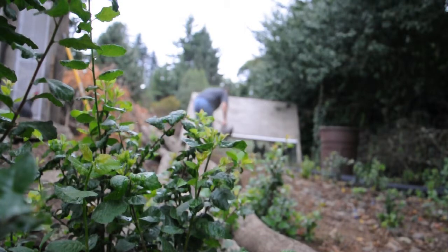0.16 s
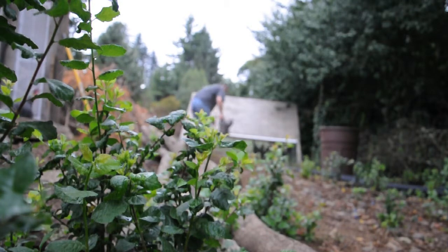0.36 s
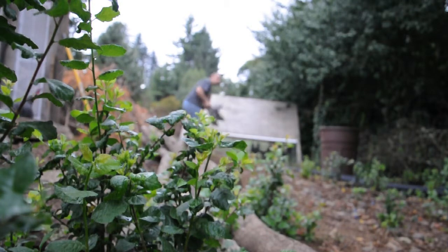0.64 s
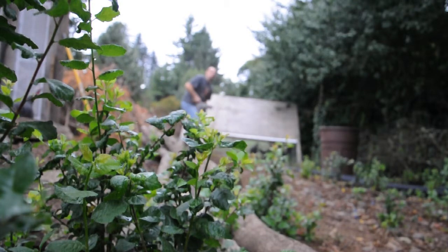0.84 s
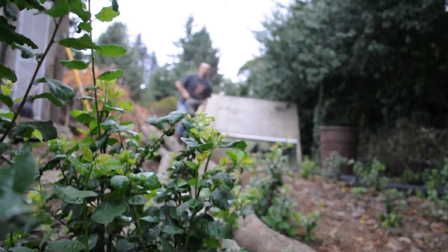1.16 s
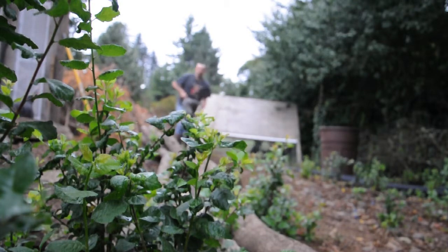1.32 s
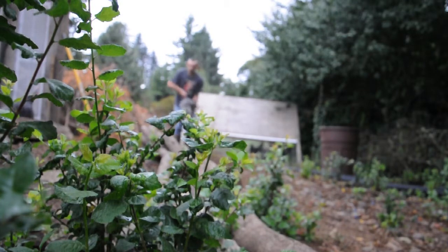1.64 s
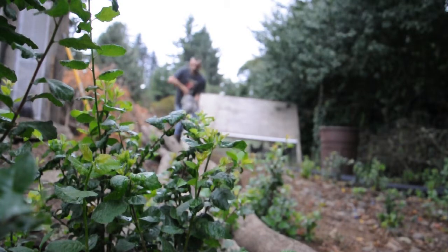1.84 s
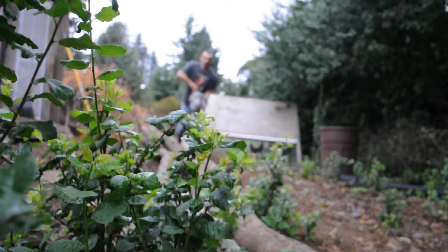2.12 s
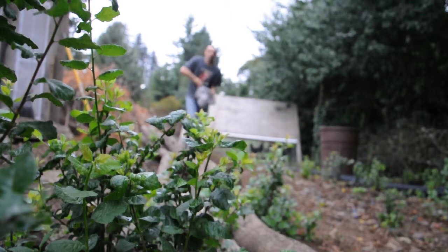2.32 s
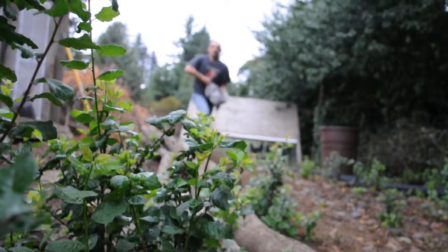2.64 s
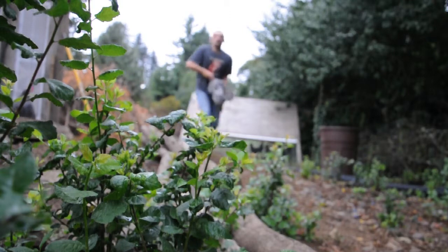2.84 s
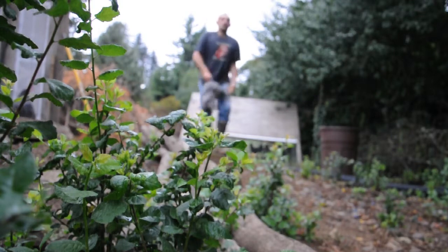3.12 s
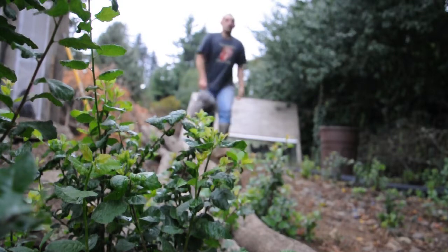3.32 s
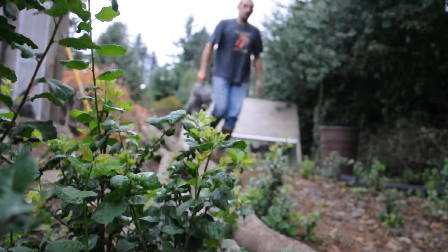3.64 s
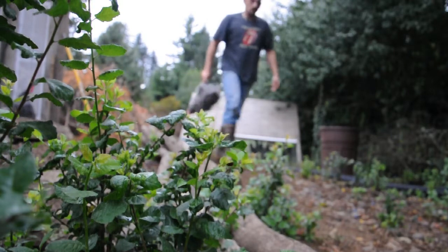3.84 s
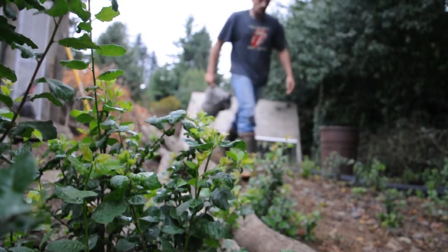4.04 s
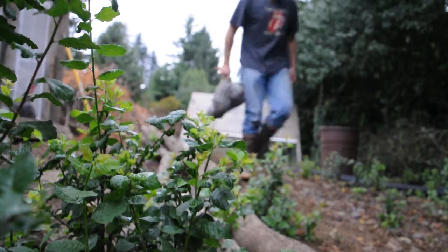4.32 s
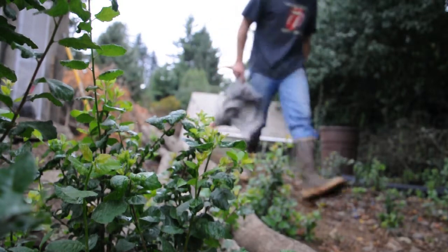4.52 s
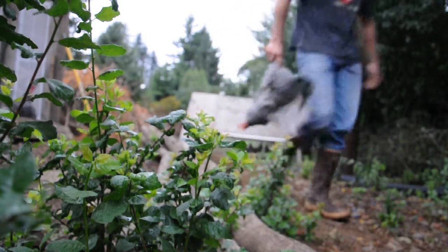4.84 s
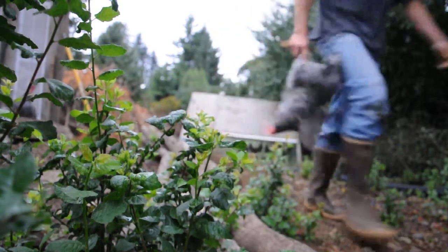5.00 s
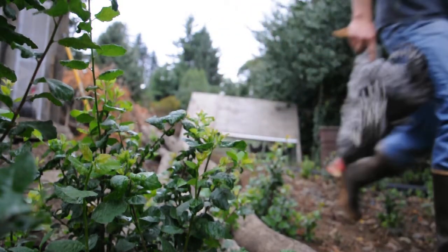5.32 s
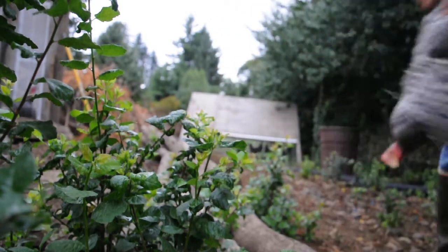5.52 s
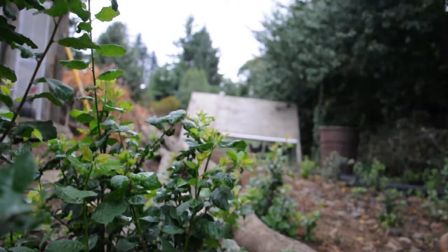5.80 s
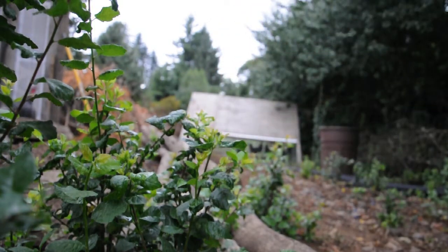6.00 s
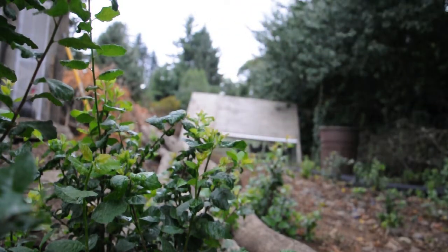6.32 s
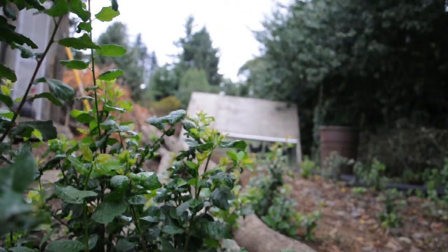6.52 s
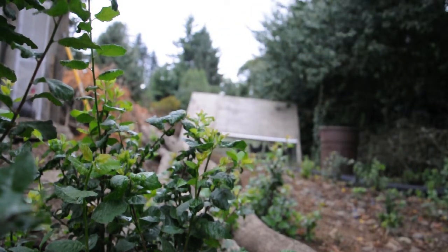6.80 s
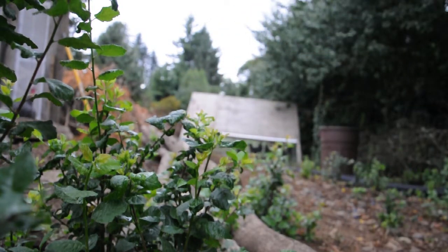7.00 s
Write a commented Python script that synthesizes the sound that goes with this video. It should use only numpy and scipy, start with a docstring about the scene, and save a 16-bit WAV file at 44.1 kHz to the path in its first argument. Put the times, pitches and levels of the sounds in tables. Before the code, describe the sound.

A heavy bump on a chicken coop leaves a short hollow boom. A hen gives high, strained squawks mixed with low creaky clucks, building to a burst of loud shrieks. She settles into softer clucking, with two more raspy squawks, as boots scuff through mulch and thud past the microphone. The garden is quiet, with a faint echo.

```python
"""A quiet garden, one microphone. A heavy bump at the coop opens the scene and leaves a hollow boom.
A hen is caught, and her syrinx answers in two voices, at times both at once: a high strained tone
(squawks that whine or shriek) and low creaky pulses (clucks). The yard echoes her faintly.
Then she is carried past the microphone, still clucking, as boots scuff and thud through the mulch."""
import sys
import numpy as np
from scipy import signal
from scipy.fft import rfft, irfft, next_fast_len
from scipy.io import wavfile
from scipy.ndimage import map_coordinates

SR = 44100
rng = np.random.default_rng(int(sys.argv[2]) if len(sys.argv) > 2 else 0)


def unload_audio(sound):
    """Save the sound as a 16-bit wav file, at the path given as the first command line argument."""
    columns = np.transpose(np.atleast_2d(sound))
    # keep every value between -1 and 1, then stretch to whole-number steps
    steps = np.round(np.clip(columns, -1, 1) * 32767)
    wavfile.write(sys.argv[1], SR, steps.astype(np.int16))


N = 315756
TIME = np.arange(N) / SR
TOP_HZ = 5050  # the treble stops here

# Resonances of the beak. Each row: centre in Hz, half-width in Hz, gain in dB.
BEAK_MODES = [(1208, 207, 1.5), (1788, 272, -7.5)]
# Higher resonances, the edge on her voice. Each row: centre in Hz, half-width in Hz, gain in dB.
EDGE_MODES = [(2847, 278, 2), (3780, 320, -2)]


def amp(db):
    return 10 ** (np.asarray(db) / 20)


def unit(x):
    return x / np.sqrt(np.mean(x ** 2) + 1e-20)


def along(points, hz):
    """Read (Hz, value) points at hz, on a log axis."""
    f, v = np.transpose(points)
    return np.interp(np.log(hz + 1), np.log(f + 1), v)


def curves(rows, t):
    """Each column after the first, at the times t."""
    s, *cols = np.transpose(rows)
    return [np.interp(t, s, c) for c in cols]


def wobble(rate, size):
    """A smooth random curve, rate knots a second."""
    knots = rng.standard_normal(int(size * rate / SR) + 4)
    return map_coordinates(knots, [np.arange(size) * rate / SR])


def filtered(x, response):
    """x through a complex frequency response."""
    size = next_fast_len(len(x) + 8192)
    return irfft(rfft(x, size) * response(np.fft.rfftfreq(size, 1 / SR)), size)[:len(x)]


def resonate(x, modes):
    """x through a bank of steep-sided resonances of alternating sign."""
    def band(f, hz, half_width):
        damping = 2j * f * half_width
        return (damping / (hz * hz - f * f + damping)) ** 2
    return filtered(x, lambda f: sum((-1) ** k * amp(db) * band(f, hz, half_width)
                                     for k, (hz, half_width, db) in enumerate(modes)))


def add(track, start, sound):
    """Mix a sound in at start seconds."""
    part = track[max(round(start * SR), 0):][:len(sound)]
    part += sound[:len(part)]


def garden(tread_swell_db=3, leaf_swell_db=7.5, crunch_db=4.5, split_hz=1500):
    """Quiet outdoor air, and the uneven rustle of boots and brushed leaves nearing the microphone."""
    # Each row: time in seconds, air level in dB, rustle level in dB.
    levels = [(0, -35, -43), (.7, -42.5, -51.5), (3.2, -42, -45), (4.3, -37, -46), (5.4, -42.5, -36.5),
              (7.1, -39, -48)]
    # Spectra of the air and the rustle. Each row: frequency in Hz, gain in dB.
    air_spectrum = [(15, -41), (25, -10.5), (107, 2), (253, -1.5), (459, -6.5), (850, -8.5), (2190, -19),
                    (2560, -23.5), (3890, -25.5), (4850, -20.5), (6300, -70), (10700, -120)]
    rustle_spectrum = [(30, 1.5), (130, -5), (350, 5), (600, -8.5), (1100, -12.5), (2400, -14.5),
                       (4500, -16.5)]

    def crunch(swell_db):
        return unit(rng.standard_normal(N) * amp(swell_db * wobble(20, N) + crunch_db * wobble(250, N)))
    air_db, rustle_db = curves(levels, TIME)
    air = unit(filtered(rng.standard_normal(N), lambda f: amp(along(air_spectrum, f))))
    tread = filtered(crunch(tread_swell_db), lambda f: amp(along(rustle_spectrum, f)) * (f < split_hz))
    leaves = filtered(crunch(leaf_swell_db), lambda f: amp(along(rustle_spectrum, f)) * (f >= split_hz))
    return amp(air_db) * air + amp(rustle_db) * unit(tread + leaves)


def thuds(crumble=0.11, crumble_t60=0.11):
    """Each dull blow on the soil is one push and a crumbling tail; the first leaves a hollow boom."""
    # The bump, then boots. Each row: start in seconds, peak in dB, low-pass corner in Hz.
    blows = [(.032, -2, 810), (.039, -3, 1347), (.064, -10.5, 302), (5.141, -16, 92), (5.722, -7.5, 520),
             (5.777, -15.5, 480), (5.9, -18.5, 450), (6.12, -20, 700), (6.404, -21.5, 348),
             (6.46, -20.5, 397), (6.494, -20.5, 700), (6.703, -16.5, 700), (7.02, -17.5, 510)]
    # Resonances of the soil. Each row: centre in Hz, half-width in Hz, gain in dB.
    soil_modes = [(129, 56, -3), (219, 164, -0.5), (330, 354, -3), (520, 214, -4), (850, 120, -22)]
    # The hollow ring. Each row: frequency in Hz, gain in dB, T60 in seconds before the final fade.
    boom_modes = [(82.8, -15, 1), (124, -19.5, 1), (166, -8.5, 1), (210, -7.5, 0.62), (308.6, -19.5, 0.82)]
    out, t = np.zeros(N), np.arange(SR // 2) / SR
    for start, db, corner_hz in blows:
        push = (t == 0) + crumble * amp(-60 * t / crumble_t60) * rng.standard_normal(len(t))
        blow = filtered(resonate(push, soil_modes), lambda f: 1 / (1 + 1j * f / corner_hz))
        add(out, start, amp(db) * blow / np.abs(blow).max())
    boom = sum(amp(db - 60 * t / t60) * np.sin(2 * np.pi * hz * t + 2.0 * wobble(25, len(t)))
               for hz, db, t60 in boom_modes)
    swell, fade = 1 - np.exp(-t / 0.11), 1 - t / t[-1]
    add(out, blows[0][0], boom * swell * fade)
    return out


def litter(grain_db=4, tick_t60=0.04):
    """Sharp little ticks, and short grainy scuffs of boots through the mulch."""
    # Each row: start in seconds, level in dB (the tick peaks 6 dB lower).
    ticks = [(.0423, 1), (4.379, -18.5), (4.639, -17.5), (4.6961, -9), (5.0946, -16.5), (6.0936, -15.5),
             (7.0168, -21.5)]
    # Each row: centre in seconds, half-length in seconds, level in dB.
    scuffs = [(3.372, 0.019, -31), (3.908, 0.032, -30), (4.083, 0.028, -30.5), (4.673, 0.037, -28),
              (4.887, 0.037, -29.5), (5.934, 0.017, -25.5), (6.667, .025, -38.5)]
    # Each row: frequency in Hz, gain in dB.
    mulch_spectrum = [(200, -6.5), (600, -2), (950, 5.5), (1400, -12), (2400, -19.5), (3500, -18),
                      (5000, -32.5)]
    out, t = np.zeros(N), np.arange(SR // 20) / SR
    grains = rng.standard_normal(N) * amp(grain_db * wobble(700, N))
    mulch = unit(filtered(grains, lambda f: amp(along(mulch_spectrum, f))))
    for centre, half_length, db in scuffs:
        out += amp(db) * mulch * np.exp(-2 * ((TIME - centre) / half_length) ** 2)
    for start, db in ticks:
        burst = rng.standard_normal(len(t)) * amp(-60 * t / tick_t60)
        tick = filtered(burst, lambda f: (f < TOP_HZ) * 1j * f / (900 + 1j * f) ** 2)
        add(out, start, amp(db) * tick / np.abs(tick).max() / 2)
    return out


def squawk(t, pitch, db, octave_db, overtone_db, buzz_db, flutter, waver, rasp_db,
           flutter_cycles=8.8, flutter_bend=0.056):
    """The high voice: a strained, fluttering tone with its octave, overtones and a half-pitch buzz."""
    # Spectra of the overtones and the buzz. Each row: frequency in Hz, gain in dB.
    overtone_spectrum = [(1900, 16.5), (2300, 8.5), (2650, -14), (3400, -2), (3900, -7), (4400, -16),
                         (5200, -12)]
    buzz_spectrum = [(400, -19.5), (580, 1), (1300, -2.5), (1750, 0), (2150, 1.5), (2900, -16.5),
                     (3900, -16.5), (4800, -17)]
    flutter = np.clip(flutter, 0, 1)
    flutter_hz = pitch / flutter_cycles * (1 + 0.25 * wobble(60, len(t)))
    beat = np.sin(2 * np.pi * np.cumsum(flutter_hz) / SR)
    pitch = pitch * (1 + waver * (1 + 3 * flutter) * wobble(250, len(t)) + flutter_bend * flutter * beat)
    phase = 2 * np.pi * np.cumsum(pitch) / SR
    tone = (np.sin(phase) + amp(octave_db) * np.sin(2 * phase)) / np.hypot(1, amp(octave_db))
    for k in range(3, 8):
        partial_db = overtone_db + along(overtone_spectrum, k * pitch) + 2.6 * wobble(70, len(t))
        tone += amp(partial_db) * np.sin(k * phase + k * k)
    for k in np.arange(6) + .5:
        partial_db = buzz_db + along(buzz_spectrum, k * pitch) + 4.4 * wobble(70, len(t))
        tone += amp(partial_db) * np.sin(k * phase + k * k)
    pulsed_hiss = rng.standard_normal(len(t)) * (1 + np.sin(phase))
    rasp = unit(resonate(pulsed_hiss, BEAK_MODES + EDGE_MODES))
    tone += amp(rasp_db) * (0.14 + flutter) * rasp
    end_fades = np.clip(np.minimum(t - t[0], t[-1] - t) / 0.00063, 0, 1)
    return np.sqrt(2) * amp(db) * end_fades * tone * (1 + .7 * flutter * beat)


def whine(swell, fade, start_hz, peak_hz, end_hz, db, octave_db, overtone_db, buzz_db, flutter,
          swell_db=21.5, fade_db=17.5):
    """Effort builds while the pitch glides; as she lets go, the pitch slides or flicks away."""
    t = np.arange(int((swell + fade) * SR)) / SR
    up, down = np.clip(t / swell, 0, 1), np.clip((t - swell) / fade, 0, 1)
    effort_db = -swell_db * (1 - up) ** 1.29 - fade_db * down ** 2.4
    pitch = start_hz + (peak_hz - start_hz) * up ** 2.3 + (end_hz - peak_hz) * down
    # octave and overtones grow with effort; the octave weakens as the pitch climbs
    octave_db = octave_db + 0.8 * effort_db - 36.5 * np.log2(pitch / peak_hz)
    overtone_db = overtone_db + 1.1 * effort_db
    return squawk(t, pitch, db + effort_db, octave_db, overtone_db, buzz_db, flutter,
                  waver=0.0087, rasp_db=-22.5)


def cluck(length, top_hz, db, open_db, edge_db, rough,
          jitter=.2, slap_spread_db=4, rasp=0.32, bounce=0.72, scatter_t60=0.041, gape_db=3, sink=0.076):
    """The low voice: membrane slaps that speed up and slow again, ringing the throat and the beak."""
    # The course of a cluck. Each row: share of its length, share of top pitch, effort in dB.
    arch = [(0, .52, -7), (.15, .72, -2), (.38, .93, 0), (.62, 1, -1.5), (.85, .96, -5), (1, .84, -10)]
    # Resonances of the throat. Each row: centre in Hz, half-width in Hz, gain in dB.
    throat_modes = [(270, 190, 2.5), (726, 152, 3)]
    t = np.arange(int(length * 2 * SR)) / SR
    progress = np.clip(t / length, 0, 1)
    tension, effort_db = curves(arch, progress)
    unevenness = jitter * (rough + (1 - tension) / 2) * wobble(300, len(t))
    cycles = np.cumsum(top_hz * tension * (1 + unevenness)) / SR
    slaps = np.diff(np.floor(cycles), prepend=-1) * amp(slap_spread_db * rough * wobble(400, len(t)))
    # air hisses through just after each slap
    hiss = rasp * rough * np.exp(-3 * (cycles % 1)) * rng.standard_normal(len(t))
    cutoff = np.clip((length - t) / 0.0035 + .5, 0, 1)
    source = (slaps + hiss) * amp(effort_db) * cutoff
    # ground and leaves scatter each slap
    scatter = rng.standard_normal(len(t)) * amp(-60 * t / scatter_t60)
    source += bounce * signal.fftconvolve(source, scatter / np.linalg.norm(scatter))[:len(t)]
    stretch = np.exp(0.074 * rng.standard_normal())  # the neck is never held the same way twice

    def ring(drive, modes, lift=1):
        return resonate(drive, [(hz * stretch * lift, width, gain) for hz, width, gain in modes])
    throat = unit(ring(source, throat_modes))
    # the beak's resonances sink and grow as the cluck goes on; the edge follows the effort
    early_beak = ring(source * (1 - progress) ** 2, BEAK_MODES, lift=1 + sink)
    late_beak = amp(gape_db) * ring(source * progress, BEAK_MODES)
    beak = unit(early_beak + late_beak)
    edge = unit(ring(source * amp(effort_db), EDGE_MODES))
    return amp(db) * np.sqrt(2) * (throat + amp(open_db) * beak + amp(edge_db) * edge)


def shriek(length, attack, release, hz, overshoot, db, overtone_db, broken_at, buzz_db,
           depth_db=20, settle_s=.009, break_s=0.0069, clean_buzz_db=-44.5, octave_db=-23.5):
    """A held squawk, purest at full force and torn at both ends, that breaks into a half-pitch buzz."""
    t = np.arange(int(length * SR)) / SR
    rise_db = depth_db * np.clip(1 - t / attack, 0, 1) ** 2
    fall_db = depth_db * np.clip(1 - (length - t) / release, 0, 1) ** 2
    slack_db = rise_db + fall_db
    pitch = hz * (1 + overshoot * np.exp(-t / settle_s) - .004 * fall_db)  # settles, then sags
    broken = np.clip((t - broken_at) / break_s + 1, 0, 1)
    buzz_db = clean_buzz_db + (buzz_db - clean_buzz_db) * broken
    # below full force it is richer in overtones and flutters more
    harsh_db = .5 * slack_db
    flutter = 0.04 + .02 * slack_db
    return squawk(t, pitch, db - slack_db, octave_db + harsh_db, overtone_db + harsh_db, buzz_db,
                  flutter, waver=.0045, rasp_db=-26.5)


def hen():
    """Both voices of the syrinx; an open beak also gives a cluck more edge."""
    # Each row: start, swell and fade in seconds; pitch in Hz at the start, at peak effort and at
    # the end; level, octave, overtones and buzz in dB; flutter from 0 to 1.
    whines = [(.27, 0.1, 0.013, 912, 1137, 1114, -19.5, -7.5, -25, -35, .1),
              (0.417, .026, 0.0064, 799, 1134, 1355, -24.5, -15.5, -21, -15, .2),
              (.48, 0.018, 0.0058, 891, 1160, 1748, -20, -16, -32, -30.5, 0),
              (2.21, .116, 0.03, 808, 836, 1260, -18.5, 5.5, -24, -23, .55),
              (2.37, 0.02, 0.016, 828, 681, 1317, -16, 17, -12, -20.5, 0.2),
              (2.602, .063, 0.039, 987, 747.6, 784, -10, 20, -15, -26, 0.3),
              (2.905, .041, .033, 1003, 942, 1027, -9, 5, -13, -35, .12),
              (5.099, .06, 0.088, 808, 733, 834, -17.5, 10.5, -24, -22, 0.8),
              (5.267, 0.01, 0.047, 759, 739, 628, -15.5, 10, -27, -21.5, .4)]
    # Each row: start and length in seconds, top pitch in Hz, level and beak opening in dB,
    # roughness from 0 to 1.
    clucks = [(0.373, .059, 331, -41, -4, 0.6), (.613, .052, 330, -41.5, -4.5, .6),
              (.825, .072, 309.4, -41.5, -2, .45), (1.019, .05, 290.2, -36.5, -3, .35),
              (1.157, .055, 324.1, -36.5, 7.5, .4), (1.312, 0.036, 419.5, -39.5, 4, .5),
              (1.389, .082, 330, -33.5, -8.5, .1), (1.612, .07, 334.2, -33.5, -12.5, .15),
              (1.861, .066, 320.7, -36.5, -5.5, .2), (2.109, .074, 330, -36.5, -5, .4),
              (2.398, .058, 278.6, -36.5, -2.5, .4), (2.643, .057, 309.6, -33, 4.5, 0.5),
              (2.904, .065, 330, -35, 3.5, .35), (3.188, .072, 369.8, -34, -3, .05),
              (3.521, .055, 337.6, -35.5, -4, 0.2), (3.694, .048, 315, -40.5, 1, .7),
              (3.812, 0.054, 330, -41, 1, .6), (4.002, .045, 369.5, -30.5, -1, .25),
              (4.233, .042, 348, -29, -1, 0.3), (4.46, .056, 360.3, -32, 2, .2),
              (4.722, .06, 334.4, -34.5, 3.5, .3), (4.988, .052, 245.4, -34, 3, .5),
              (5.278, .045, 397.2, -28, 0.5, .7), (5.548, .058, 281.8, -30, 3.5, .4),
              (5.955, .082, 290.4, -29.5, -2, .5), (6.302, 0.067, 316, -28.5, -3.5, .45),
              (6.894, .05, 297.2, -29.5, 0.5, .05)]
    # Each row: start, length, attack and release in seconds, pitch in Hz, overshoot as a share of it,
    # level and overtones in dB, seconds until fully broken, buzz in dB.
    shrieks = [(1.167, 0.17, 0.071, .04, 850.5, -.03, -9, -16, .112, -15.5),
               (2.692, 0.058, 0.027, 0.012, 1148, 0.2, -10, -21.5, 0.0049, -11.5),
               (2.981, 0.062, 0.0029, .016, 1139, 0.13, -8.5, -37, 0, -18)]
    # The edge dulls as she is carried past. Each row: time in seconds, dB relative to the beak.
    edge_share = [(0, -7), (2, -3), (3.5, -11.5), (5.5, -11), (6.3, -16.5)]
    voice = np.zeros(N)
    for start, length, top_hz, db, open_db, rough in clucks:
        edge_db = open_db + curves(edge_share, start)[0]
        add(voice, start, cluck(length, top_hz, db, open_db, edge_db, rough))
    for start, *shape in whines:
        add(voice, start, whine(*shape))
    for start, *shape in shrieks:
        add(voice, start, shriek(*shape))
    return voice


def yard(voice):
    """Two wall echoes and a soft scatter from the trees."""
    # Each row: delay in seconds, gain in dB.
    wall_echoes = [(.036, -20.5), (.215, -40)]
    # Decay of the scatter. Each row: frequency in Hz, T60 in seconds.
    decay_times = [(200, 1), (1000, 0.58), (4000, 0.66)]
    # Less scatter when the hen is near the microphone. Each row: time in seconds, gain in dB.
    diffuse_share = [(0, -11), (3.2, -19.5), (5.3, -37), (7.1, -25.5)]
    hz, t, spectrum = signal.stft(rng.standard_normal(SR * 3 // 4), SR, nperseg=256)
    decay = amp(-60 * t / along(decay_times, hz)[:, None])
    tail = signal.istft(spectrum * decay, SR, nperseg=256)[1]
    scattered = voice * amp(curves(diffuse_share, TIME)[0])
    out = signal.fftconvolve(scattered, tail / np.linalg.norm(tail))[:N]
    for delay, db in wall_echoes:
        add(out, delay, amp(db) * voice)
    return out


def scene():
    """The hen, her echo, the ground and the garden air, in mono."""
    voice = hen()
    return (voice + yard(voice) + thuds() + litter() + garden())[None]


def record(dry, ceiling=.92, rolloff_hz=4350):
    """A small microphone: the tallest peaks are rounded; its treble rolls off, then stops."""
    rounded = dry[0] / (1 + np.abs(dry[0] / ceiling) ** 8) ** (1 / 8)
    return filtered(rounded, lambda f: (f < TOP_HZ) / np.sqrt(1 + (f / rolloff_hz) ** 30))[None]


dry = scene()
out = record(dry)
unload_audio(out)
```